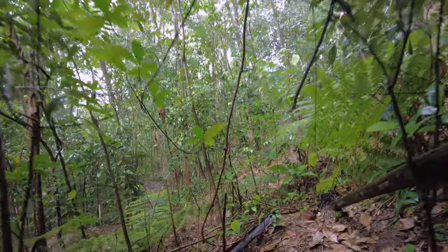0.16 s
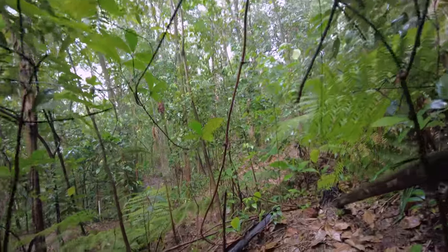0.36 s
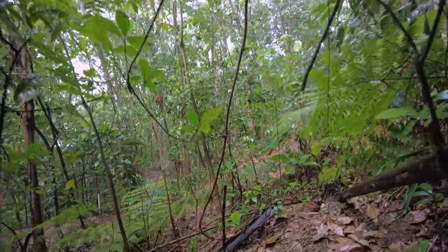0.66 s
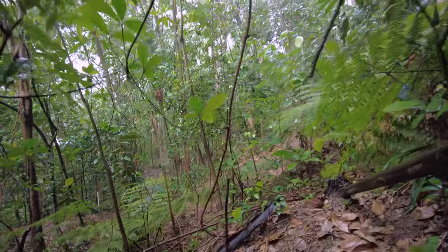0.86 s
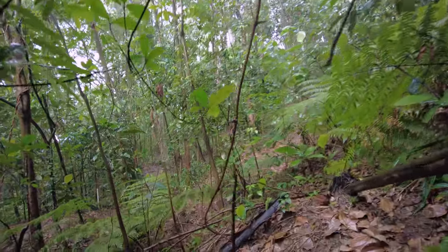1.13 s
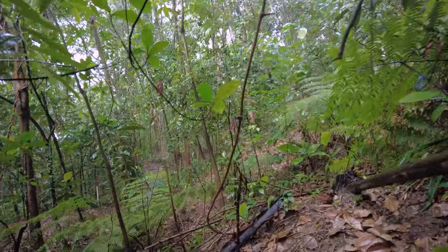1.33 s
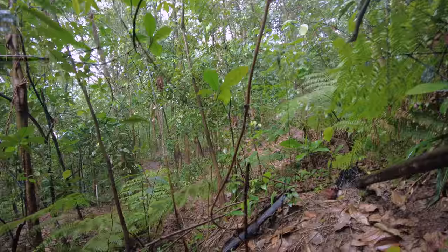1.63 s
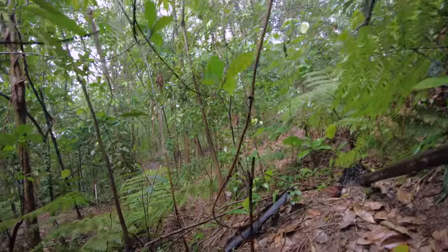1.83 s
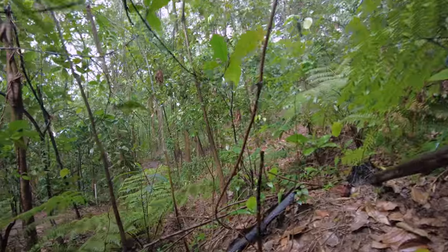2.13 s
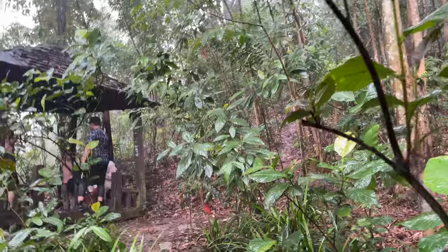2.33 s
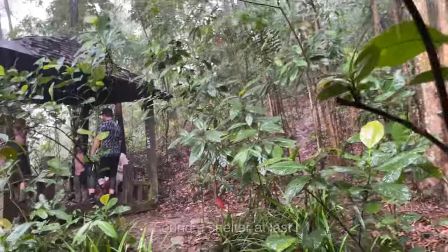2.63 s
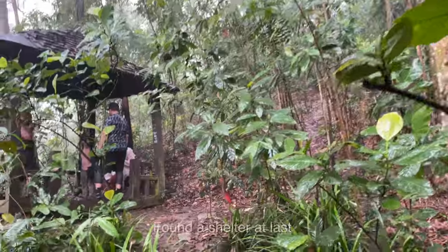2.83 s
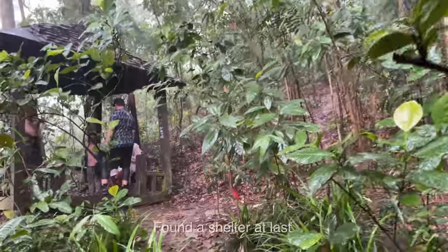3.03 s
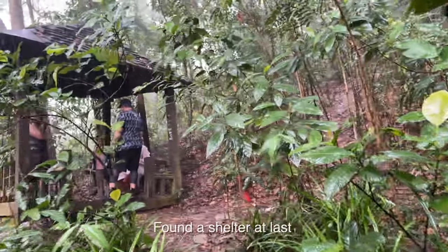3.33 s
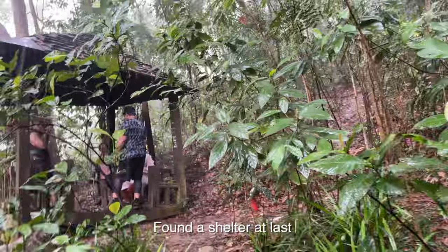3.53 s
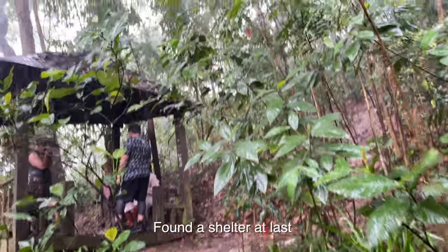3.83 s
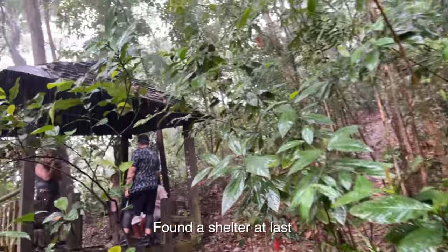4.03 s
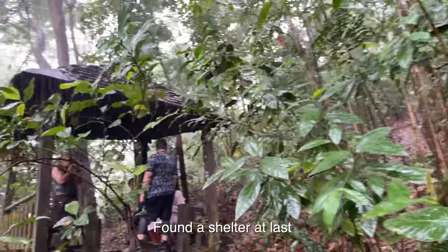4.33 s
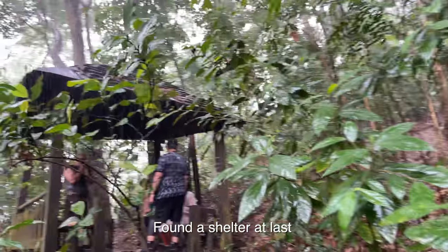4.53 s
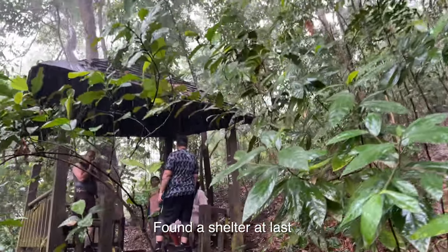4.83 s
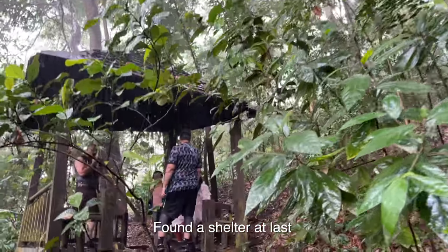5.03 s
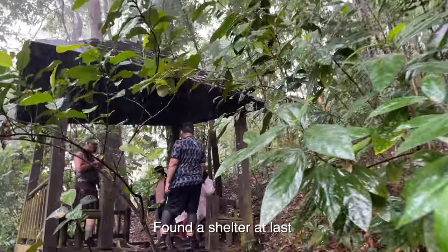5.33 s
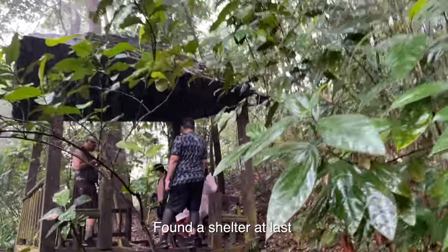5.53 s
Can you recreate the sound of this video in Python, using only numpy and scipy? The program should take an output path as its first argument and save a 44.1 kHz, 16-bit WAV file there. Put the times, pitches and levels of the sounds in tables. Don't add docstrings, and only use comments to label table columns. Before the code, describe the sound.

A small stereo microphone outdoors catches quiet drizzle, a throbbing deep rumble and sparse bright leaf ticks. A hard cut brings a wide, dense downpour with ringing drips and low wind buffeting. One cracking blow shakes the housing; automatic gain nearly silences the rain for a moment, then lets it swell back softer, with less bass, amid scattered drips and soft thuds.

```python
import sys
import numpy as np
from scipy import signal
from scipy.fft import rfft, irfft, next_fast_len
from scipy.io import wavfile
from scipy.ndimage import uniform_filter1d

SR = 44100
rng = np.random.default_rng(int(sys.argv[2]) if len(sys.argv) > 2 else 0)


def decibels_to_gain(level_db):
    exponent = np.asarray(level_db, float) / 20
    return 10 ** exponent


def wav_record(signal):
    frames = np.transpose(np.atleast_2d(signal))
    bounded = np.clip(frames, -1, 1)
    quanta = np.round(bounded * 32767).astype(np.int16)
    wavfile.write(sys.argv[1], SR, quanta)


N = 250047
PADDED = next_fast_len(N, real=True)
T = np.arange(N) / SR
HZ = np.maximum(np.fft.rfftfreq(PADDED, 1 / SR), 1)
CUT_S = 2.3322
DUCK_S = 3.783


def in_time(rows):
    s, *columns = np.transpose(rows)
    return [np.interp(T, s, c) for c in columns]


def at_hz(points):
    hz, *columns = np.transpose(points)
    return [np.interp(np.log(HZ), np.log(hz), c) for c in columns]


def to_time(spectrum):
    return irfft(spectrum, PADDED)[..., :N]


def rms_one(x):
    return x / np.sqrt(np.mean(x ** 2) + 1e-20)


def cut(x, hz, kind, order):
    return signal.sosfilt(signal.butter(order, hz, kind, fs=SR, output="sos"), x)


def ramp(start, length):
    return np.clip((T - start) / length, 0, 1)


def drift(rate):
    r = np.exp(-80 * np.pi * rate / SR)
    coarse = rng.standard_normal(N // 40 + 2002)
    slow = signal.lfilter([1], [1, -2 * r, r * r], coarse)[2000:]
    return np.interp(np.arange(N) / 40, np.arange(len(slow)), rms_one(slow))


def swells(rows, floor_db):
    power = sum(decibels_to_gain(2 * db) * np.exp(-((T - s) / spread) ** 2) for s, db, spread in rows)
    return np.sqrt(decibels_to_gain(2 * floor_db) + power)


def panned(db):
    return decibels_to_gain([[db / 2], [-db / 2]])


def bursts(rows, flat=3.2):
    out = np.zeros((2, N))
    for s, db, hz, length, pan_db, sag in rows:
        u = np.arange(round(length * SR)) / SR
        swell = np.abs(np.sin(np.pi * (u / length) ** 0.64)) ** flat
        wave = decibels_to_gain(db) * swell * np.sin(2 * np.pi * hz * u * (1 - sag * u / length / 2))
        out[:, round(s * SR):][:, :len(u)] += panned(pan_db) * wave
    return out


def clicks(rows, cycles):
    return bursts([(s, db, hz, cycles / hz, pan_db, 0) for s, db, hz, pan_db in rows])


def patter(per_s, spread_db, hiss_db, patchy_db):
    sizes = decibels_to_gain(spread_db * np.minimum(rng.exponential(1, (3, N)), 5)) * rng.choice([-1, 1], (3, N))
    drops = sizes * (rng.random((3, N)) < per_s / SR)
    white = rms_one(drops) + decibels_to_gain(hiss_db) * rng.standard_normal((3, N))
    spectrum, out, gust = rfft(white, PADDED), 0, drift(8.1)
    octaves = np.clip(np.log2(HZ), 9, 13)
    for octave in range(9, 14):
        share = np.cos(np.pi / 2 * np.clip(octaves - octave, -1, 1)) ** 2
        out = out + decibels_to_gain(patchy_db * (0.4 * gust + drift(29))) * to_time(spectrum * share)
    return rfft(out, PADDED)


# (multiple of the centre pitch, width [Hz], level [dB])
RUMBLE_BANDS = [(1, 2.3, 2.5), (.55, 26, -11.5), (1.3, 20, -15.5)]
# (time [s], centre [Hz])
RUMBLE_CENTRE = [(0.0, 56.17), (1.3, 58.6), (1.57, 50.85), (1.89, 48.5), (2.0, 51.8), (2.33, 51)]
# (time of the top [s], level [dB], spread [s])
RUMBLE_ROLLS = [(.03, -37, .06), (.2, -34, .04), (.32, -33, 0.052), (.47, -31, 0.015), (.62, -48, .07),
                (.76, -33, 0.022), (.88, -30.5, 0.028), (.97, -36, 0.045), (1.08, -34.5, 0.051),
                (1.24, -32, 0.034), (1.36, -40, .04), (1.44, -34, 0.029), (1.58, -33, .03),
                (1.67, -34.5, 0.061), (2.01, -40, .04), (2.14, -32.5, 0.047), (2.24, -33, 0.034)]
# (time of the top [s], level [dB], spread [s])
HIGH_ROLLS = [
    (.3, -46, .03),
    (.47, -48, .04),
    (.78, -43, .025),
    (.96, -46, .04),
    (1.26, -47, .04),
    (1.52, -39, .04),
    (1.9, -39.5, .07),
    (2.06, -51, 0.047),
    (2.23, -32, 0.042),
]


def rumble():
    centre_hz, = in_time(RUMBLE_CENTRE)
    turn = 2 * np.pi * np.cumsum(centre_hz) / SR

    def band(multiple, hz):
        return drift(hz) * np.cos(multiple * turn) + drift(hz) * np.sin(multiple * turn)

    low = sum(decibels_to_gain(db) * band(multiple, width_hz) for multiple, width_hz, db in RUMBLE_BANDS)
    evened = low / np.sqrt(uniform_filter1d(low ** 2, size=4000))
    overtone = swells(HIGH_ROLLS, floor_db=-57) * band(2, hz=3.2)
    return swells(RUMBLE_ROLLS, floor_db=-41) * evened + decibels_to_gain(-1.0) * overtone


# (frequency [Hz], level [dB per Hz])
LIGHT_COLOUR = [(60, 7.5), (150, -5.5), (400, -5.5), (900, -2), (2000, -6.5), (2800, -8), (4400, -11),
                (7000, -17), (9500, -21), (11500, -25.5), (13000, -22), (15700, -25.5)]
# (frequency [Hz], likeness [0-1], lead of the right port [radians])
LIGHT_PORTS = [(100, .97, 0), (300, .7, -.4), (600, .55, -1.6), (900, .75, -2.8), (1100, .87, -3.7),
               (1350, .72, -3.1), (1800, .4, -3.1), (3200, .05, -3.1)]
# (time [s], level [dB])
WET_PORT_RING = [(0.0, -42.5), (0.39, -41.5), (1.16, -44.5), (1.92, -41), (2.32, -42.5)]


def drizzle():
    port_hz, port_q, port_db, leak_db = 1060, 9.8, 1, -10.5
    mean_db, follows = -47, 0.38
    both, left, right = patter(per_s=3000, spread_db=2.6, hiss_db=4, patchy_db=.6)
    alike, lead = at_hz(LIGHT_PORTS)
    pair = np.sqrt(alike) * both + np.sqrt(1 - alike) * np.array([left, right])
    ratio = HZ / port_hz
    port = decibels_to_gain(2 * port_db) / ((1 - ratio ** 2) ** 2 + (ratio / port_q) ** 2)
    pair[1] *= np.sqrt(port + decibels_to_gain(2 * leak_db)) * np.exp(1j * lead)
    field = to_time(pair * decibels_to_gain(at_hz(LIGHT_COLOUR)[0]))
    ring_db, = in_time(WET_PORT_RING)
    level_db = mean_db + follows * (ring_db - ring_db[T < CUT_S].mean())
    field[1] *= decibels_to_gain(ring_db - level_db - 8)
    return decibels_to_gain(level_db + 11.0) * field / np.std(field[0])


# (time [s], peak level [dB], pitch [Hz], left over right [dB])
LEAF_TICKS = [
    (0.1186, -35, 2650, 17),
    (0.2713, -40, 2570, 15),
    (0.6536, -34, 3125, 7),
    (0.7617, -35, 3000, 11.0),
    (0.9373, -37, 2690, 11.5),
    (1.4477, -33, 2380, 10.5),
    (1.6637, -29, 3080, 10.5),
    (1.7547, -31, 3000, 10.5),
    (1.948, -28.5, 3550, 11.0),
]


def ticks():
    return decibels_to_gain(-5.5) * clicks(LEAF_TICKS, cycles=7.7)


# (time [s], level [dB])
FINE_SPLASHES = [
    (.89, -49.5),
    (1.2, -53),
    (1.57, -61),
    (1.95, -50),
]


def spray():
    puffs = sum(decibels_to_gain(db) * np.exp(-((T - s) / 0.0087) ** 2) for s, db in FINE_SPLASHES)
    return puffs * cut(rng.standard_normal(N), 9500, "high", order=4) * panned(12)


# (frequency [Hz], level [dB per Hz])
HEAVY_COLOUR = [(40, -22), (100, -16), (250, -4.5), (600, -0.5), (1300, 0), (2150, -1.5), (2800, -5.5),
                (4000, -9), (6300, -10), (9000, -8.5), (11000, -7.5), (12300, -18), (13500, -14.5),
                (15700, -34)]
# (frequency [Hz], likeness [0-1], lead of the right port [radians])
HEAVY_PORTS = [(100, .8, .3), (500, .45, -.2), (1000, .15, -.8), (2000, .2, -.8), (3000, .33, -1.1),
               (4200, .66, -.3), (5300, .2, -1.1), (6150, .86, -.15), (7000, .33, -.7), (7600, .55, -1.1),
               (8600, .95, 0), (9000, .95, .7), (10240, .99, 3.14), (13400, .97, 9.6)]


def downpour():
    both, left, right = patter(per_s=3000, spread_db=3.5, hiss_db=4.0, patchy_db=0.92)
    alike, lead = at_hz(HEAVY_PORTS)
    shared = np.sqrt(alike) * both * np.exp(.5j * lead * [[-1], [1]])
    pair = shared + np.sqrt(1 - alike) * np.array([left, right])
    field = rms_one(to_time(pair * decibels_to_gain(at_hz(HEAVY_COLOUR)[0])))
    top_db = -1 - 20 * ramp(5.17, 0.28)
    spectrum = rfft(field, PADDED)
    bass = to_time(spectrum / (1 + (HZ / 427) ** 4))
    treble = to_time(spectrum / (1 + (11200 / HZ) ** 6))
    return gain_control(field + (decibels_to_gain(wind_guard()) - 1) * bass + (decibels_to_gain(top_db) - 1) * treble)


# (time of the top [s], level [dB], spread [s])
WIND_GUSTS = [(2.36, -61, .015), (2.53, -57, 0.048), (2.68, -53, .07), (3.0, -64, .04), (3.3, -56, .1),
              (3.445, -48, .025), (3.6, -58, .03), (3.74, -49.5, .03), (4.03, -60, .025), (4.19, -64, .04),
              (4.36, -68, .07), (4.62, -69, .05), (5.2, -68, .06), (5.3, -68, .04), (5.52, -76, .025)]


def wind():
    noise = rng.standard_normal((3, N))
    lumps = cut(noise[0] + .4 * noise[1:], 68, "low", order=3)
    low = rms_one(cut(lumps, 35, "high", order=2))
    return decibels_to_gain(0.5) * swells(WIND_GUSTS, floor_db=-93) * low


# (time [s], peak level [dB], pitch [Hz], length [s], pitch sag [0-1])
HOUSING_DROPS = [(2.522, -31, 130, 0.022, 0.3), (3.364, -22, 520, 0.0047, .1),
                 (3.426, -23, 298, 0.013, 0.57), (3.43, -29, 148, 0.016, 0.3),
                 (3.856, -46.5, 420, 0.007, 0.5), (4.001, -49.5, 199, 0.044, 1),
                 (4.15, -43, 260, 0.018, 0.1), (4.42, -51, 181, 0.037, 0.5), (4.563, -41, 260, 0.02, 0.8),
                 (4.638, -36, 263, 0.016, .7), (4.928, -45, 270, 0.013, 0.3),
                 (5.027, -27.5, 540, 0.013, 0.18), (5.03, -41.5, 262, 0.011, 0),
                 (5.105, -38, 330, 0.014, 0.65), (5.142, -45, 200, 0.022, 0.8), (5.183, -44, 250, .014, .3),
                 (5.236, -29, 208, 0.048, .05), (5.238, -27.5, 400, 0.02, 0.16),
                 (5.253, -36.5, 140, .03, 0.25), (5.51, -58, 121, .03, 0)]


def thuds():
    left_db = 4
    return bursts([(s, db, hz, length, left_db, sag) for s, db, hz, length, sag in HOUSING_DROPS])


# (time [s], peak level [dB], pitch [Hz], left over right [dB])
NEAR_DRIPS = [
    (2.712, -16, 1390, 0.0),
    (2.796, -22, 1280, 0.5),
    (3.4016, -7.5, 2230, -9),
    (4.13, -19, 1890, 3),
    (4.271, -22, 2060, 2),
    (4.296, -27, 1200, 1.0),
    (4.403, -20, 1330, 4),
    (4.513, -26, 1150, 1.5),
    (5.0662, -21.5, 1340, -2),
    (5.0672, -15, 2220, -11),
]


def drips():
    return decibels_to_gain(-5.0) * clicks(NEAR_DRIPS, cycles=8.4)


# (time [s], peak level [dB], pitch [Hz], length [s], left over right [dB], pitch sag [0-1])
HOUSING_MODES = [
    (3.7768, -10, 315, 0.022, -3.5, 0.16),
    (3.785, -10, 165, 0.017, -4.5, 0.14),
    (3.7775, -15.5, 440, 0.022, -5, 0.09),
    (3.781, -15, 628, 0.0094, 9, 0.1),
    (3.784, -16.5, 920, 0.0097, 2, 0.29),
    (3.818, -39, 125, 0.03, 2, .2),
]
TIPPING = [
    (3.7686, -9.5, 296, 0.013, 0.0054, .02),
]
# (time [s], peak level [dB], pitch [Hz], left over right [dB])
SHARP_CRACK = [
    (3.7832, -7.5, 1370, 8),
    (3.7834, -11, 2870, 12),
    (3.7836, -8.5, 6000, 7),
]
# (time [s], peak level [dB], pitch [Hz], time to fall 60 dB [s])
LOW_RING = [
    (3.789, -27, 63, 0.14),
    (3.79, -21.5, 96.7, .11),
]


def knock():
    hum = 0
    for s, db, hz, t60 in LOW_RING:
        u = np.maximum(T - s, 0)
        hum = hum + decibels_to_gain(db - 60 * np.minimum(u / t60, 3)) * np.sin(2 * np.pi * hz * u)
    tipping = bursts(TIPPING) * [[1], [-1]]
    return bursts(HOUSING_MODES, flat=0.94) + tipping + clicks(SHARP_CRACK, cycles=2.46) + hum


def gain_control(rain):
    after = np.maximum(T - DUCK_S, 0)
    steady = decibels_to_gain(-23 - np.minimum(5000 * after, 99))
    held = decibels_to_gain(-54 - 81 * after) * (after > 0) * cut(rain, 5000, "low", order=1)
    back = decibels_to_gain(-29.5 - 0.67 * after) * ramp(3.882, .25) ** 2.13
    return (steady + back) * rain + held


# (from [s], to [s], depth [dB])
GUARD_CUTS = [
    (3.902, 3.98, -8),
    (4.045, 4.142, -5.5),
    (4.46, 5.8, -7),
    (4.469, 4.56, -17),
    (4.69, 5.097, -17),
    (5.35, 5.5, -4),
]


def wind_guard():
    def ease(s):
        return .5 + .5 * np.tanh((T - s) / .012)

    return sum(db * (ease(start) - ease(end)) for start, end, db in GUARD_CUTS)


def narrowed(x):
    offset, size, width = 752, 2048, 8
    mid_top_hz, lower_top_hz, side_top_hz, ragged_hz = 13200, 12550, 11900, 180
    window = np.sin(np.pi * (np.arange(size) + .5) / size)
    pair = np.array([x[0] + x[1], x[0] - x[1]])[:, offset:] / 2
    hz, s, frames = signal.stft(pair, SR, window, nperseg=size, noverlap=size // 2)
    power = (np.abs(frames[:, :1024]) ** 2).reshape(2, 128, width, -1).mean(axis=2)
    band_hz = hz[4:1024:width, None]
    usual = power[:, 40:70].mean(axis=(0, 1))
    weak_db = -13 + 1.5 * rng.standard_normal(power.shape)
    strong = (power > usual * decibels_to_gain(2 * weak_db)) | (band_hz < 3800)
    stray = rng.random(power.shape[1:]) < np.where(s < 5.25, .008, .2)
    stray = stray & (band_hz > 12400) & (band_hz < 14200)
    top_hz = np.where(s < DUCK_S, mid_top_hz, lower_top_hz) + ragged_hz * rng.standard_normal(len(s))
    keep_mid = strong[0] & (band_hz < top_hz)
    keep_side = (strong[1] & (band_hz < side_top_hz)) | stray
    frames[:, :1024] *= np.repeat(np.array([keep_mid, keep_side]), width, axis=1)
    thinned = signal.istft(frames, SR, window, nperseg=size, noverlap=size // 2)[1]
    mid, side = thinned[:, :N - offset]
    return np.pad([mid + side, mid - side], ((0, 0), (offset, 0)))


def scene():
    first = (rumble() + drizzle() + ticks() + spray()) * np.clip((CUT_S - T) / 0.002, 0, 1)
    fade_in = ramp(CUT_S + .005, .045) ** 1.6
    second = (downpour() + wind()) * fade_in + thuds() + drips()
    wide = uniform_filter1d(1. * (T > 3.77) * (T < 3.795), size=150)
    second = narrowed(second * (1 - wide)) + second * wide
    return first + cut(second + knock(), 57, "high", order=2)


def top_cut(x):
    return signal.sosfilt(signal.butter(12, 16530, fs=SR, output="sos"), x)


def record(dry):
    rounded = dry / (1 + np.abs(dry / .95) ** 6) ** (1 / 6)
    steep = signal.ellip(12, .5, 80, 15790, fs=SR, output="sos")
    mix = signal.sosfilt(steep, rounded)
    return top_cut(mix)


dry = scene()
out = record(dry)
wav_record(out)
```